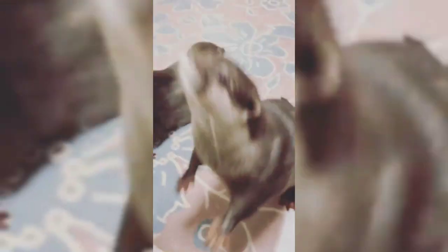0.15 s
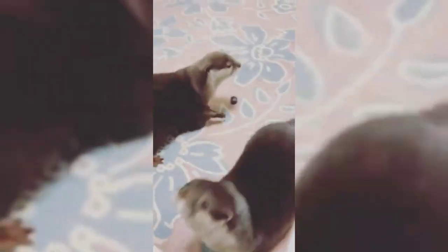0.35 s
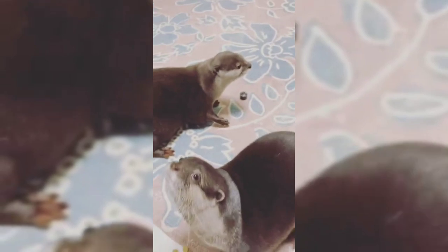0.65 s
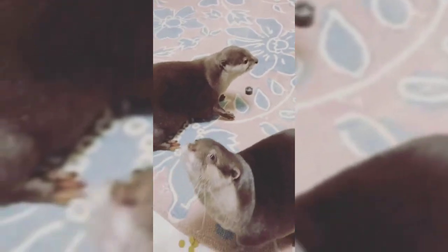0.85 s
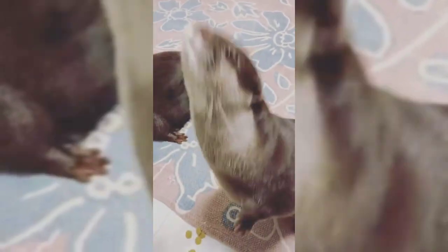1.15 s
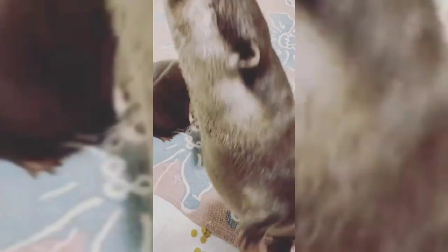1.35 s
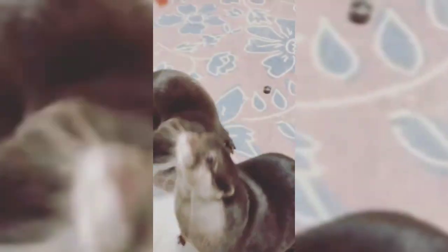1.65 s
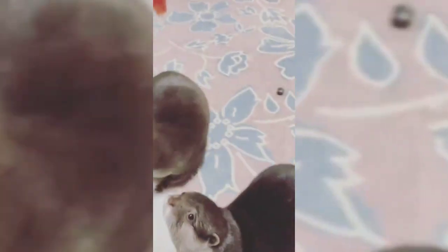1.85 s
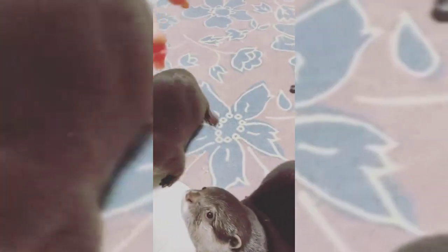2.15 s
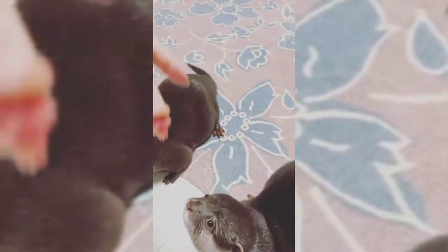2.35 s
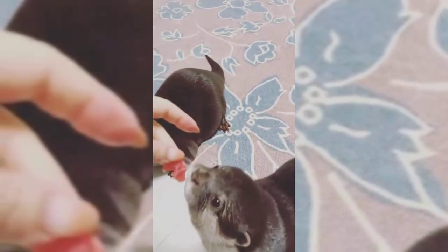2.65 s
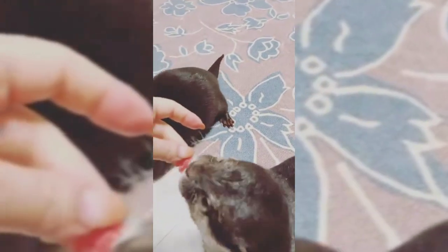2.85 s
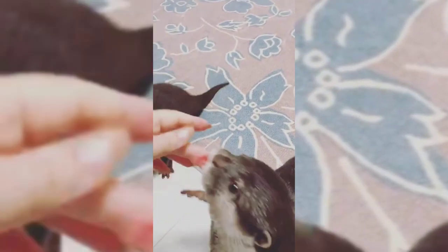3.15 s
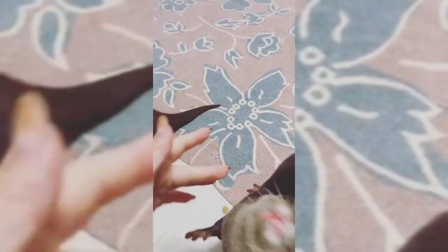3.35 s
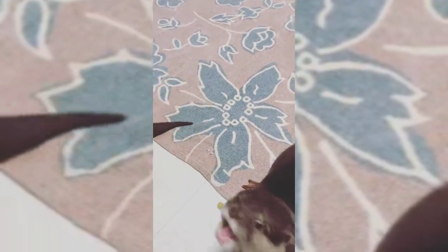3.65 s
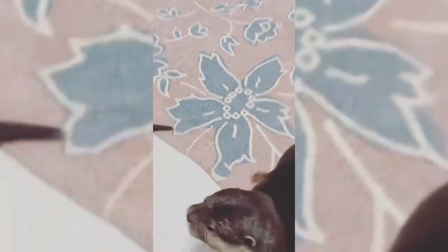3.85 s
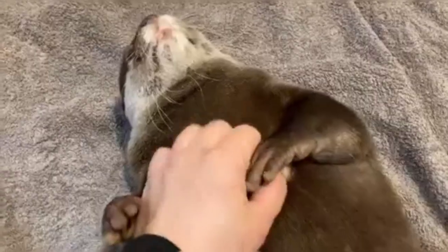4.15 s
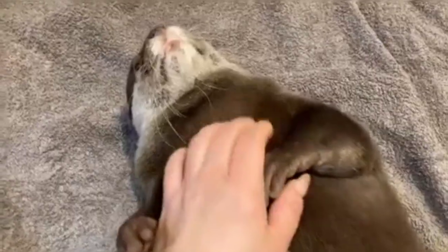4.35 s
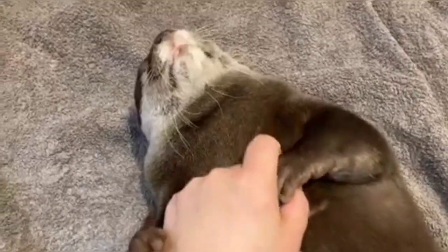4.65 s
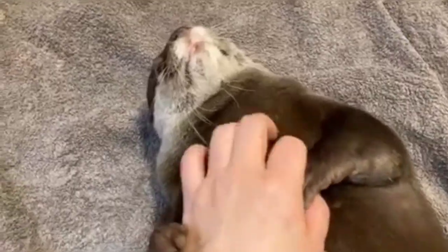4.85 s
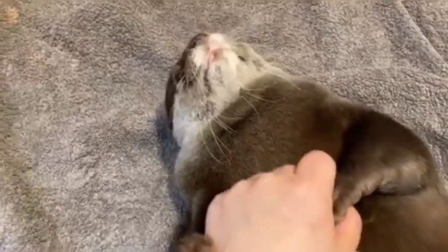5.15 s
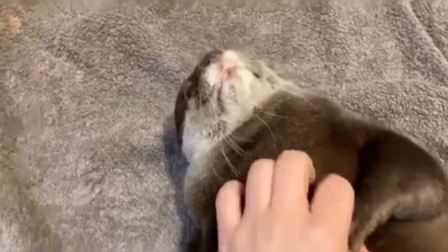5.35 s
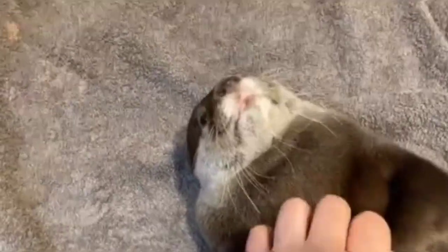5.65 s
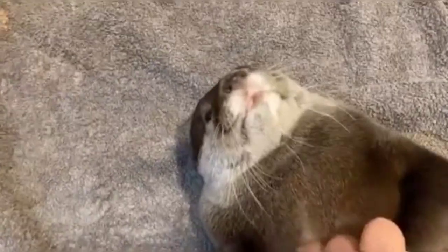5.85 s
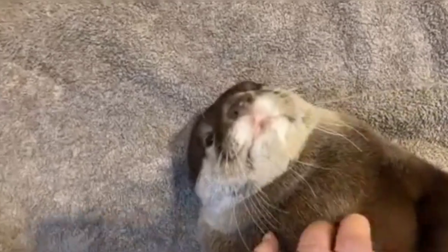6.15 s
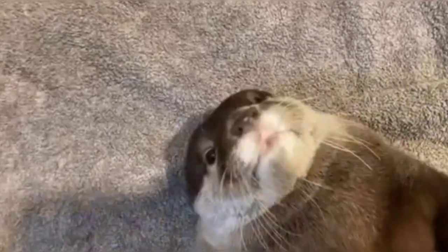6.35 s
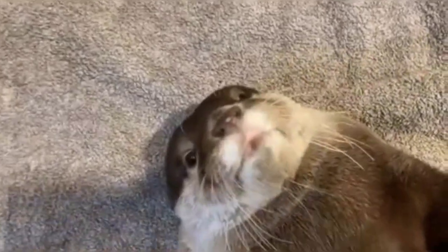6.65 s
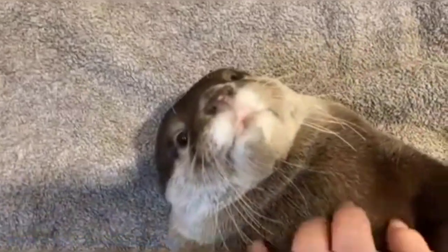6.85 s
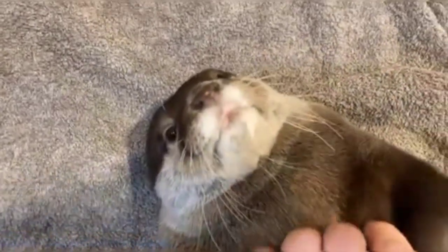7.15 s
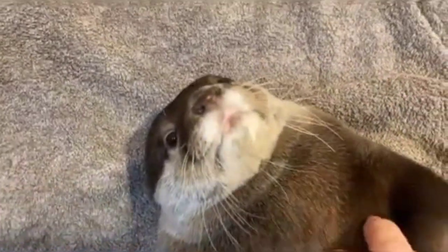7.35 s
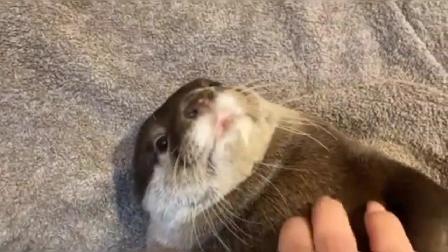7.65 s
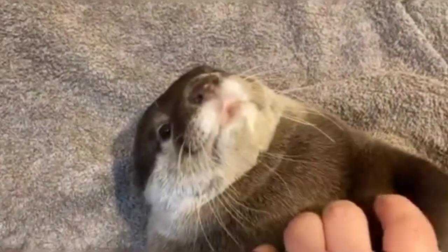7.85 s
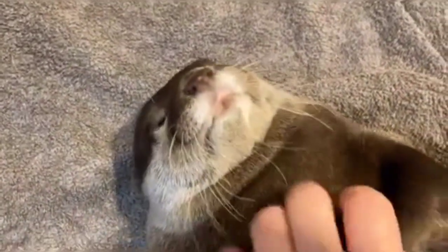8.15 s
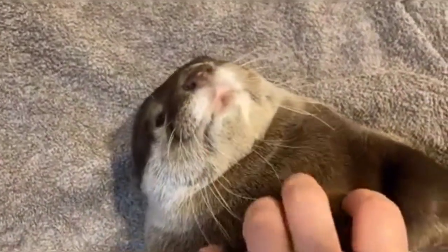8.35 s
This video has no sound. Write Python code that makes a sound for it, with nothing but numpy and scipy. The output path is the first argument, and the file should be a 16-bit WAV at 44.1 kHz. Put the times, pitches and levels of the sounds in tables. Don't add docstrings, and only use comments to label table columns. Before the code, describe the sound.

A bare, quiet room opens with the dying ring of a high whistle. Otters shift on a rug: soft low thumps through the boards, tiny claw ticks and short fur scuffs throughout. A quick falling squeak comes at 0.2 s, very faint low grunts from 0.6 to 1.1, then at 1.35-1.5 a burst of thin whistles, rising then sliding steeply down, amid heavier thuds. Quieter scuffling follows until a loud piercing chirp drops at 2.85, with a short falling squeak at 3.0. More ticks and brushing end in abrupt silence near 3.9. At 4.0 a steady fan rush and low hum start, with the tail of a close otter whine. Raspy, bright whines follow: short at 4.9, long and sagging from 6.3 to 7.0, and a last at 8.0-8.4, each slipping downward in pitch. Faint sniffs come at 4.2, 5.2, 7.1 and 8.45.

```python
import sys
import numpy as np
from scipy import signal
from scipy.fft import rfft, irfft, next_fast_len
from scipy.io import wavfile
from scipy.ndimage import uniform_filter1d, map_coordinates

SR = 44100
rng = np.random.default_rng(int(sys.argv[2]) if len(sys.argv) > 2 else 0)


def makeup_ratio(level_db):
    decades = np.asarray(level_db, float) / 20
    return 10 ** decades


def pcm_store(signal):
    levels = np.round(np.clip(np.atleast_2d(signal), -1, 1) * 32767)
    wavfile.write(sys.argv[1], SR, levels.astype(np.int16).T)


N = 375291
TIME = np.arange(N) / SR

# (time [s], level [dB])
SCENE_END = [
    (3.897, 11.5),
    (3.901, -21),
    (3.928, -44),
    (3.936, -100),
]
JOIN_S = 4.0005

# (frequency [Hz], density [dB per Hz])
RUG_AIR = [(18, -41), (30, -16.5), (75, -6.5), (241, -20), (307, -15.5), (666, -36.5), (891, -30.5),
           (2080, -42), (4410, -40.5), (9800, -56.5), (12700, -82.5), (21600, -120)]
# (frequency [Hz], density [dB per Hz])
FAN_AIR = [(18, -48), (30, -16.5), (119, -7), (192, -15), (243, -23), (301, -15), (400, -18.5), (473, -18),
           (644, -8), (1630, -22.5), (4310, -30.5), (7280, -44.5), (8800, -83.5), (11400, -79),
           (19400, -120)]
RUG_AIR_DB, FAN_AIR_DB = -67, -48
# (centre [Hz], width [Hz], level [dB])
HUM = [(146, 32, -59.5), (242.5, 12, -50.5), (403, 13.8, -55.5), (436.8, 4.2, -60), (644, 13, -82.5),
       (676, 27, -64)]

# (start [s], end [s], level [dB])
SNIFFS = [
    (4.2, 4.3, -62),
    (5.22, 5.28, -68),
    (7.1, 7.27, -64.5),
    (8.44, 8.6, -62),
]
# (frequency [Hz], density [dB per Hz])
NOSE = [(5000, -25), (6800, -16), (8000, -7), (8700, -4), (9200, -59)]
SNIFF_RISE_DB_PER_S, SNIFF_FALL_DB_PER_S, NOSE_REST_DB = 90.5, 186, -82.5

# (start [s], end [s], strength [dB], brush over rub [dB], hiss over rub [dB])
STROKES = [(0, 0.039, -76.5, -6, -4), (0.283, .38, -72, -14, -11), (0.432, 0.555, -64.5, -22, -7),
           (1.156, 1.33, -75, -3.5, -15.5), (1.365, 1.459, -59.5, -12, -17), (1.712, 1.802, -61, -14.5, -6),
           (2.077, 2.12, -82, -1, -10), (2.453, 2.552, -72, -4, -8), (2.777, 2.925, -66.5, -9.5, -8.5),
           (3.01, 3.07, -66, 0, -33), (3.223, 3.288, -63.5, -16, -11.5), (3.362, 3.466, -63, -10.5, -13.5),
           (3.497, 3.625, -70.5, -10.5, -13.5), (3.706, 3.78, -69.5, -7.5, -5),
           (3.838, 3.902, -60.5, -11.5, -6)]
STROKE_RISE_DB_PER_S, STROKE_FALL_DB_PER_S = 267.5, 262
FUR_REST_DB = [-80.5, -96, -100]
# (frequency [Hz], density [dB per Hz])
RUB = [(300, -20), (500, -4.5), (1300, -3.5), (2400, -5.5), (3500, -40)]
BRUSH = [(1800, -27), (2500, -0.5), (4300, 0), (5200, -17), (7000, -30.5)]
HISS = [(5500, -40), (6500, -4), (8200, -0.5), (9600, -1), (10000, -60)]

# (time [s], peak level [dB], low part [dB])
CLAWS = [(0.101, -55.5, -8), (0.131, -49.5, -3.5), (0.416, -47.5, -8), (0.465, -72, 16.5),
         (1.257, -55.5, -2.5), (2.079, -59, -13), (3.244, -45, -3), (3.258, -50.5, -5), (3.359, -49, -20),
         (3.529, -59, -15.5), (3.604, -42.5, -34), (3.759, -57, -26), (3.883, -40.5, -19)]
# (time [s], peak level [dB])
PAWS = [(0.148, -43), (0.293, -32.5), (0.58, -48), (1.091, -45), (1.311, -41.5), (1.442, -30), (1.671, -38),
        (1.775, -40), (1.888, -35), (2.206, -47), (2.72, -54), (2.886, -41), (3.118, -45), (3.354, -39),
        (3.37, -38.5), (3.649, -43.5), (3.847, -37)]
# (time [s], peak level [dB])
KNOCKS = [(0.134, -48.5), (0.27, -47.5), (0.396, -56), (0.554, -56), (1.399, -38), (1.779, -48.5),
          (1.843, -53), (2.095, -66), (2.228, -64), (3.017, -58), (3.118, -49.5), (3.26, -51.5),
          (3.389, -56), (3.834, -44)]
# (centre [Hz], width [Hz], level [dB])
BOARDS = [(68.4, 6.6, -7), (160, 28, -0.5), (233.5, 43, -13.5), (290, 80, -11.5)]

# (start [s], end [s], first pitch [Hz], last pitch [Hz], effort [dB])
SQUEAKS = [
    (0.218, 0.248, 1290, 973, -53),
    (0.574, .88, 198.2, 210, -74),
    (.9, 1.118, 207.4, 218, -73),
    (1.437, 1.585, 2080, 1947, -69),
    (1.599, 1.625, 1429, 1208, -59.5),
    (2.995, 3.112, 1583, 1245, -48),
]
# (frequency [Hz], gain [dB])
SNOUT = [(2000, 5), (3000, -5), (4500, -8), (6500, -7.5), (8500, -4), (9300, -6), (10000, -25)]
SQUEAK_RISE, SQUEAK_FALL, SQUEAK_EDGE_DB = 0.082, 0.24, 18.5
KICK, KICK_S, BITE_S = .1, .014, .009
PRESSED_DB, PRESS_GROWS, BITE_DB = -49, 3.4, 22
DULLS_DB_PER_S = [114, 438]

# (time [s], pitch [Hz], effort [dB], mouth opening as octave over first partial [dB])
WHISTLES = [
    [(1.335, 5900, -60, -40), (1.35, 6460, -44.5, -40), (1.383, 6774, -30.5, -40), (1.396, 6700, -41, -40)],
    [(1.362, 8400, -50, -40), (1.375, 8000, -43.5, -40), (1.384, 7600, -36.5, -40),
     (1.39, 7300, -45.5, -40)],
    [(1.374, 6014, -43.5, -40), (1.383, 5890, -39, -27), (1.405, 4860, -29, -5), (1.417, 4250, -30.5, 8.5),
     (1.445, 4158, -33.5, 2), (1.46, 3957, -29.5, -11.5), (1.478, 3635, -34.5, -4.5),
     (1.497, 3185, -35.5, -3), (1.512, 3050, -58.5, 3)],
    [(2.832, 5800, -36, -34), (2.840, 5366, -23, -22.5), (2.847, 4793, -18.5, -1),
     (2.852, 4620, -17.5, 19.5), (2.857, 4423, -32, 11.5)],
    [(2.856, 3900, -28.5, 8.5), (2.860, 3670, -11.5, 17.5), (2.864, 3502, -16, 20), (2.870, 3315, -26, 16),
     (2.880, 3156, -41, -1)],
]
# (frequency [Hz], gain [dB])
PIPE = [(6000, -2), (10000, -6), (11500, -32.5), (13000, -60)]

# (start [s], end [s], first partial [dB], overtones [dB], brightness [dB])
WHINES = [
    (3.604, 4.102, -42.5, -36.5, 4),
    (4.892, 5.147, -44, -38.5, -1),
    (6.312, 7.026, -39.5, -29.5, 0.5),
    (8.015, 8.423, -42.5, -31.5, 3),
]
# (time [s], pitch [Hz])
MELODY = [
    [(4, 856), (4.025, 876), (4.097, 866)],
    [(4.893, 1235), (4.922, 1280), (4.938, 1168), (4.978, 1152), (5.008, 1050), (5.026, 1088), (5.08, 1082),
     (5.101, 1040), (5.129, 1038)],
    [(6.335, 1222), (6.386, 1040), (6.487, 952), (6.604, 942), (6.648, 862), (6.704, 830), (6.736, 862),
     (6.965, 838), (6.998, 886)],
    [(8.03, 1290), (8.06, 1180), (8.066, 968), (8.134, 950), (8.18, 940), (8.196, 976), (8.322, 954),
     (8.338, 914), (8.408, 898)],
]
# (frequency [Hz], gain [dB])
THROAT = [(1700, -10.5), (2300, -2.5), (2850, 3), (3200, -5), (3470, 0.5), (3800, 3.5), (4800, -5),
          (5450, -15), (6700, -1.5), (7300, -1.5), (8200, -7), (8800, -31), (10000, -81.5)]
GAPE = [0.96, 0.97, 1, 0.95]
# (time [s], level [dB])
LIPS = [
    (4.092, -35),
    (4.896, -39),
    (5.14, -44),
    (6.312, -55),
    (7.014, -35),
    (8.022, -38.5),
    (8.413, -32.5),
]
OPEN_S, SHUT_S, CLOSED_DB = 0.0045, 0.0084, 14.5
CATCH_S, CATCH_WIDE_S, CATCH_DB = 0.034, 0.02, -9
LAST_PUSH_S, LAST_PUSH_DB = 0.055, 5.5
OVER_DB = [2, 0, -8]
BUILD_S = [0.025, 0.081, 0.066]
BUILD_DB = [30, 35, 39]
TIRE_DB_PER_S = [8, 11.5, 8]
DIE_S = [0.026, 0.014, 0.037]
DIE_DB = [30, 8, 21]
# (time [s], pitch gain [0-1], rise [s], fall [s])
TUGS = [
    (6.438, .075, .03, .016),
    (6.525, .04, .025, .045),
    (6.9, .07, .06, .045),
    (8.1, .085, .022, .034),
    (8.155, .04, .02, .025),
    (8.27, .045, .03, .024),
]
SAG, SAG_S = .13, .014
# (start [s], end [s], depth [1])
DOUBLING = [
    (4.0, 4.09, 0.28),
    (4.998, 5.125, 0.48),
    (6.669, 6.822, 0.26),
    (8.07, 8.137, 0.37),
]
DOUBLED = [(2, 0), (3, 1), (4, .15), (5, 0), (6, .1), (7, .5), (8, 0)]
# (start [s], end [s], overtone [number], loss [dB])
CHOKES = [(4.0, 4.1, 2, 7), (4.038, 4.046, 6, 20), (4.078, 3.5, 5, 19), (4.064, 3.1, 4, 15),
          (5.0, 5.03, 3, 5), (5.036, 5.066, 3, 28), (5.066, 4.6, 3, 4.5), (5.11, 5.14, 4, 9),
          (5.4, 5.14, 5, 8), (6.358, 6.372, 3, 19), (6.445, 6.495, 3, 31), (6.495, 6.6, 3, 5.5),
          (6.555, 6.565, 3, 15), (6.32, 6.44, 3, 4.5), (8.34, 8.42, 8, 11), (8.056, 8.066, 2, 21.5),
          (16, 8.068, 6, 13), (4.89, 4.913, 2, 18), (5.11, 5.15, 2, 11), (6.708, 6.72, 3, 26),
          (6.9, 6.908, 3, 17), (6.955, 6.975, 2, 7), (6.48, 6.56, 6, 5.5), (6.8, 6.93, 6, 8.5),
          (8.094, 8.112, 3, 23), (8.22, 8.232, 3, 26.5), (8.355, 8.368, 3, 25), (8.362, 8.43, 2, 30),
          (8.9, 8.15, 8, 9), (3.012, 3.03, 2, 8), (3.02, 3.12, 3, 8), (3.0, 3.12, 6, 9.5)]
CHOKE_EDGE_S, FALTER_DB = .004, 9

# (frequency [Hz], likeness [0-1])
RUG_ALIKE = [(200, .92), (600, 0.029), (2000, 0.34), (5000, 0.74), (8000, 1)]
FAN_ALIKE = [(100, 0.91), (400, 0.83), (1500, 0.21), (2500, 0.017), (6000, 0.19), (7000, 0.57), (8400, 1)]
# (frequency [Hz], lead [radians])
RUG_LEAD = [(300, .05), (2000, 2.6), (3000, 3.29), (5700, 3.84), (7400, 4.9), (7900, 6.28)]
FAN_LEAD = [(300, 0.15), (700, 2.51), (1500, 1.67), (3000, 6.3), (6500, 18.04), (7800, 18.6), (8400, 2.8)]
WHISTLE_LEAD = [(3000, 2.4), (4000, 1.1), (4600, 2.2), (5700, 3.1), (6500, 4.2), (7400, 4.9), (7900, 6.28)]
WHINE_LEAD = [(300, .1), (1000, 1.8), (2000, 2.4), (3100, 3.1), (3800, 5), (4800, 5.4), (6000, 7.4),
              (7300, 6.3), (8000, 4.3), (8800, 3.14)]
# (frequency [Hz], left over right [dB])
RUG_PAN = [(500, 0.5), (1500, -3), (2300, 7), (5000, -3.5), (7000, 3.5)]
WHISTLE_PAN = [(3200, 0.5), (4200, -2.5), (5200, -4.5), (7000, 1)]
WHINE_PAN = [(300, 25.5), (1000, 11.5), (1900, 9), (3200, 4), (4500, 0), (6100, -3), (7500, 2.5),
             (9000, -0.5)]
# (frequency [Hz], 60 dB decay time [s])
RUG_ROOM = [(1000, 0.21), (4000, 0.4), (9000, 0.15)]
TOWEL_ROOM = [(1000, .5), (3500, .55), (7000, .45), (9000, .15)]
# (frequency [Hz], level [dB per bin])
AUDIBLE = [(1500, -125), (3000, -106), (5500, -106), (8000, -108), (9500, -100), (9900, -72.5)]
# (time [s], level [dB])
SMEAR = [(3.9, -13.5), (4.0, -20.5)]


def unit(x):
    return x / np.sqrt(np.mean(x ** 2) + 1e-20)


def along(points, hz):
    f, v = np.transpose(points)
    return np.interp(np.log(hz + 1), np.log(f + 1), v)


def curves(rows, t=TIME):
    s, *cols = np.transpose(rows)
    return [np.interp(t, s, c) for c in cols]


def wobble(rate, size=N):
    knots = rng.standard_normal(int(size * rate / SR) + 4)
    return map_coordinates(knots, [np.arange(size) * rate / SR])


def ramp(t, span):
    return np.clip(1 - t / span, 0, 1)


def held(t, start, end):
    return ramp(start - t, CHOKE_EDGE_S) * ramp(t - end, CHOKE_EDGE_S)


def swells(rows, rise_db, fall_db, rest_db):
    levels = [db - rise_db * np.maximum(a - TIME, 0) - fall_db * np.maximum(TIME - b, 0) for a, b, db in rows]
    return np.maximum(np.max(levels, axis=0), rest_db)


def filtered(x, response):
    m = next_fast_len(N + 8192)
    return irfft(rfft(x, m) * response(np.fft.rfftfreq(m, 1 / SR)), m)[..., :N]


def shape(spectrum):
    return lambda hz: makeup_ratio(along(spectrum, hz))


def ports(x, lead, pan):
    side = np.array([[.5], [-.5]])
    return filtered(x, lambda hz: makeup_ratio(side * along(pan, hz)) * np.exp(1j * side * along(lead, hz)))


def rush(gain, alike, lead, patchy_db):
    z = signal.stft(rng.standard_normal((2, N)), nperseg=512)[2]
    field = uniform_filter1d(rng.standard_normal(z.shape[1:]), size=7, axis=0)
    field = uniform_filter1d(field, size=10, axis=1)
    pair = signal.istft(z * makeup_ratio(patchy_db * unit(field)), nperseg=512)[1][:, :N]

    def mid_side_gain(hz):
        turn = np.arccos(np.clip(along(alike, hz), 0, 1)) / 2
        return gain(hz) * np.array([np.cos(turn), np.sin(turn)])

    mid, side = filtered(pair, mid_side_gain)
    return unit(ports(np.array([mid + side, mid - side]), lead, [(100, 0.0056)]))


def room(x, decay):
    hz, t, z = signal.stft(rng.standard_normal((2, SR // 2)), SR, nperseg=256)
    tail = signal.istft(z * makeup_ratio(-60 * t / along(decay, hz)[:, None]), SR, nperseg=256)[1]
    delayed = np.pad(x, (130, 0))[None]
    return signal.fftconvolve(delayed, tail / np.linalg.norm(tail[0]), axes=1)[:, :N]


def still_air():
    level = makeup_ratio(RUG_AIR_DB - 2 + 0.96 * wobble(6.5))
    return level * rush(shape(RUG_AIR), RUG_ALIKE, RUG_LEAD, patchy_db=3.5)


def fan_air():
    level = makeup_ratio(FAN_AIR_DB - 2.0 + 0.21 * wobble(3.1))
    return level * rush(shape(FAN_AIR), FAN_ALIKE, FAN_LEAD, patchy_db=2.0)


def fan_hum():
    def bands(f):
        return sum(makeup_ratio(db) / np.sqrt(w) / (1 + ((f - c) / w) ** 2) for c, w, db in HUM)
    return makeup_ratio(-51 + 0.74 * wobble(2.01)) * rush(bands, FAN_ALIKE, FAN_LEAD, patchy_db=1.5)


def earlier_whistle():
    def band(hz):
        return 1 / (1 + ((hz - 5200) / 420) ** 6) + 1.5 / (1 + ((hz - 5400) / 90) ** 4)
    return makeup_ratio(-43.5 - 60 * TIME / 0.33) * rush(band, RUG_ALIKE, RUG_LEAD, patchy_db=5.5)


def sniffs():
    level_db = swells(SNIFFS, SNIFF_RISE_DB_PER_S, SNIFF_FALL_DB_PER_S, NOSE_REST_DB)
    return makeup_ratio(level_db) * rush(shape(NOSE), FAN_ALIKE, FAN_LEAD, patchy_db=5.0)


def fur():
    grain = 3.3 * wobble(25) + 0.75 * wobble(110)
    start, end, db, brush_share, hiss_share = np.transpose(STROKES)
    colours = [(RUB, 0, -7.5, 3.5), (BRUSH, brush_share, 2.0, 4.0), (HISS, hiss_share, 1.0, 4.5)]
    out = 0
    for (colour, share, trim_db, patchy_db), rest_db in zip(colours, FUR_REST_DB):
        strokes = zip(start, end, db + share)
        level_db = swells(strokes, STROKE_RISE_DB_PER_S, STROKE_FALL_DB_PER_S, rest_db)
        out = out + makeup_ratio(level_db + trim_db + grain) * rush(shape(colour), RUG_ALIKE, RUG_LEAD, patchy_db)
    return out


def claws():
    out, t = np.zeros(N + SR), np.arange(1300) / SR
    for s, db, low_db in CLAWS:
        crack = makeup_ratio(-10.5 - 60 * t / 0.014) * rng.standard_normal(len(t))
        knock = makeup_ratio(low_db + 1.5 - 60 * t / 0.019) * np.sin(2 * np.pi * 1200 * t)
        out[round(s * SR):][:len(t)] += makeup_ratio(db) * (crack * np.clip(-low_db / 12, 0, 1) + knock)
    return out[:N]


def paws():
    push, knock = np.zeros(N), np.zeros(N)
    for s, db in PAWS:
        push[round(s * SR)] = makeup_ratio(db + 56)
    for s, db in KNOCKS:
        knock[round(s * SR)] = makeup_ratio(db + 46.5)

    def mode(f, c, w, db):
        return makeup_ratio(db) * 1j * f * w / (c * c - f * f + 1j * f * w)

    def boom_response(f):
        return mode(f, *BOARDS[0]) * mode(f, 66.8, 31, 0) / (1 + 1j * f / 90)

    def knock_response(f):
        return sum(mode(f, *m) for m in BOARDS[1:]) / (1 + 1j * f / 260) ** 3

    return filtered(push, boom_response) + filtered(knock, knock_response)


def lips():
    out, t = np.zeros(N + SR), np.arange(1300) / SR
    for s, db in LIPS:
        out[round(s * SR):][:len(t)] += makeup_ratio(db - 60 * t / 0.13) * rng.standard_normal(len(t))
    return filtered(out[:N], lambda hz: 1j * hz / (1 + 1j * hz / 500) / 500 / (1 + 1j * hz / 3500) ** 2)


def voice(calls, mouth, regions_hz, waver, jitter, flutter_db, count, slips=False, gape=None):
    out = np.zeros(N + SR)
    for rows, stretch in zip(calls, gape or np.ones(len(calls))):
        start, size = round(rows[0][0] * SR), round((rows[-1][0] - rows[0][0]) * SR)
        t = (start + np.arange(size)) / SR
        k = np.arange(2, count + 1)[:, None]
        hz, first_db, *over_db = curves(rows, t)

        slip = uniform_filter1d(np.abs(np.gradient(np.log(hz))) * SR, size=701)
        rasp = np.clip(slip / 20 + .02, 0, .45) if slips else .12
        slow = waver * (wobble(35, size=size) + .8 * wobble(95, size=size))
        hz = uniform_filter1d(hz, size=131) * (1 + slow + jitter * wobble(400, size=size))
        turn = 2 * np.pi * np.cumsum(hz) / SR

        flutter = [wobble(45, size=size) + wobble(200, size=size) / 2 for _ in range(count)]
        flutter = flutter_db * np.array(flutter)
        shares = np.eye(len(over_db))
        effort_db = sum(db * np.interp(k * hz, regions_hz, share) for db, share in zip(over_db, shares))
        level_db = effort_db + along(mouth, k * hz / stretch) + flutter[1:]
        over = makeup_ratio(level_db) * np.sin(k * turn + k * k / 5)

        choke_db = sum(loss * held(t, a, b) * (k == round(n)) for a, b, n, loss in CHOKES)
        chance = np.array([wobble(70, size=size) for _ in k])
        choke_db = choke_db + FALTER_DB * np.maximum(chance - 1, 0)
        uneven = sum(depth * held(t, a, b) for a, b, depth in DOUBLING)
        uneven = uneven * np.maximum(1 + .7 * wobble(70, size=size), 0)
        doubled = uneven * np.interp(k, *np.transpose(DOUBLED)) * np.cos(turn / 2)
        over = over * (makeup_ratio(-choke_db) + doubled)
        over = over * (1 - rasp + rasp * np.array([wobble(900, size=size) for _ in k]))

        edge = np.clip(np.minimum(np.arange(size), size - np.arange(size)) / 60, 0, 1)
        first = makeup_ratio(first_db + flutter[0] / 2) * np.sin(turn)
        out[start:start + size] += np.sqrt(2) * edge * (first + over.sum(axis=0))
    return out[:N]


def squeak(start, end, first_hz, last_hz, db):
    u = np.linspace(0, 1, num=61)
    t = u * (end - start)
    hz = (first_hz + (last_hz - first_hz) * u) * (1 + KICK * np.exp(-(t / KICK_S) ** 4))
    fall_db = SQUEAK_EDGE_DB * ramp(1 - u, SQUEAK_FALL)
    first_db = db - SQUEAK_EDGE_DB * ramp(u, SQUEAK_RISE) - fall_db
    bite_db = db + PRESS_GROWS * (db - PRESSED_DB) - BITE_DB * ramp(t, BITE_S) ** 0.21 - fall_db
    over_db = [bite_db - dull * t for dull in DULLS_DB_PER_S]
    return np.transpose([start + t, hz, first_db, *over_db])


def squeaks():
    calls = [squeak(*row) for row in SQUEAKS]
    return voice(calls, SNOUT, [3500, 6000], waver=.004, jitter=.004, flutter_db=2, count=6)


def whistle(points):
    s, hz, db, open_db = np.transpose(points)
    return np.transpose([s, hz, db - np.maximum(open_db, 0), db + np.minimum(open_db, 0)])


def whistles():
    calls = [whistle(w) for w in WHISTLES]
    tones = voice(calls, PIPE, [8000], waver=.006, jitter=.008, flutter_db=3, count=2)
    return tones * makeup_ratio(-4.5 + 2.2 * wobble(250))


def whine(start, end, first_db, over_db, bright_db, steps):
    t = np.arange(max(start, JOIN_S), end, .001)
    since, left = t - start, end - t
    tug = sum(gain * ramp(s - t, rise) * ramp(t - s, fall) for s, gain, rise, fall in TUGS)
    hz = curves(steps, t)[0] * (1 + tug - SAG * ramp(left, SAG_S))
    first = first_db - CLOSED_DB * (ramp(since, OPEN_S) + ramp(left, SHUT_S))
    first = first + LAST_PUSH_DB * ramp(left - SHUT_S, LAST_PUSH_S)
    first = first + CATCH_DB * ramp(np.abs(since - CATCH_S), CATCH_WIDE_S)
    over = []
    for i in range(3):
        level = over_db + OVER_DB[i] + (i - 1) * bright_db
        fade = TIRE_DB_PER_S[i] * since + DIE_DB[i] * ramp(left, DIE_S[i])
        over.append(level - BUILD_DB[i] * ramp(since, BUILD_S[i]) - fade)
    return np.transpose([t, hz, first, *over])


def whines():
    calls = [whine(*row, steps) for row, steps in zip(WHINES, MELODY)]
    return voice(calls, THROAT, [2400, 4000, 6500], waver=.006, jitter=.0045, flutter_db=2.5, count=11,
                 slips=True, gape=GAPE)


def rug_shot():
    high = whistles()
    low = squeaks() + claws()
    near = ports(high, WHISTLE_LEAD, WHISTLE_PAN) + ports(low, RUG_LEAD, RUG_PAN)
    near = near + ports(paws(), [(100, 0.197)], [(100, -0.82)])
    walls = makeup_ratio(-14) * room(high, RUG_ROOM) + makeup_ratio(-12.0) * room(low, RUG_ROOM)
    return (near + walls + still_air() + fur() + earlier_whistle()) * makeup_ratio(curves(SCENE_END)[0])


def towel_shot():
    cry = whines() + lips()
    near = ports(cry, WHINE_LEAD, WHINE_PAN)
    walls = makeup_ratio(-21) * room(cry, TOWEL_ROOM)
    return (near + walls + fan_air() + fan_hum() + sniffs()) * (TIME > JOIN_S)


def scene():
    return rug_shot() + towel_shot()


def masked(x, masked_db):
    hz, t, z = signal.stft(np.array([x[0] + x[1], x[0] - x[1]]) / 2, SR, nperseg=1024)
    count = len(hz) // 8 * 8
    power = (np.abs(z[:, :count]) ** 2).reshape(2, -1, 8, z.shape[2]).mean(axis=2)
    band = np.pad(np.repeat(power, 8, axis=1), ((0, 0), (0, len(hz) - count), (0, 0)))
    band = uniform_filter1d(band, size=3, axis=2)

    mask = uniform_filter1d(band.max(axis=0), size=40, axis=0) * makeup_ratio(2 * masked_db)
    mask = mask + makeup_ratio(2 * along(AUDIBLE, hz))[:, None]
    drift = rng.standard_normal((2, count // 8 + 1, z.shape[2]))
    drift_db = 3 * unit(uniform_filter1d(drift, size=3, axis=2))
    mask = mask * makeup_ratio(2 * np.repeat(drift_db, 8, axis=1)[:, :len(hz)])
    soft = 1 / (1 + (mask / (np.abs(band) + 1e-20)) ** 4)
    kept = np.where(hz[:, None] > 2100, soft, 1)

    noise = rng.standard_normal(z.shape) + 1j * rng.standard_normal(z.shape)
    spread = uniform_filter1d(uniform_filter1d(band, size=4, axis=2), size=16, axis=1)
    smear = makeup_ratio(curves(SMEAR, t)[0]) * np.sqrt(np.abs(spread)) * noise
    mid, side = signal.istft(kept * (z + smear), SR, nperseg=1024)[1][:, :N]
    return np.array([mid + side, mid - side])


def band_limit(x):
    return signal.sosfilt(signal.butter(12, 10500, fs=SR, output="sos"), x)


def record(dry):
    thinned = masked(dry, masked_db=-11.5) * (np.abs(TIME - 3.968) > .0325)
    mix = filtered(thinned, lambda hz: 1 / (1 + (hz / 10100) ** 60))
    return band_limit(mix)


dry = scene()
out = record(dry)
pcm_store(out)
```